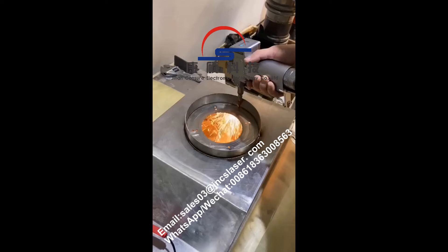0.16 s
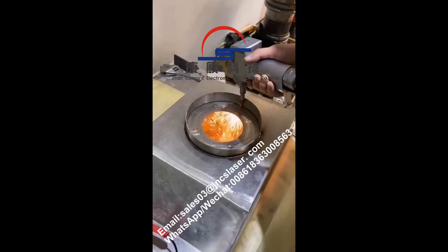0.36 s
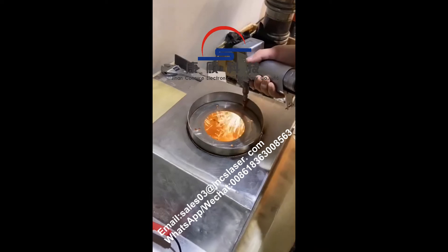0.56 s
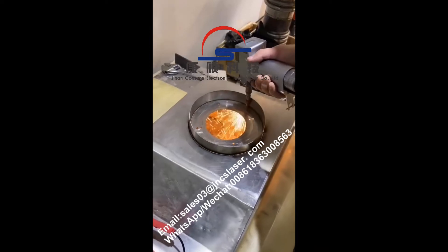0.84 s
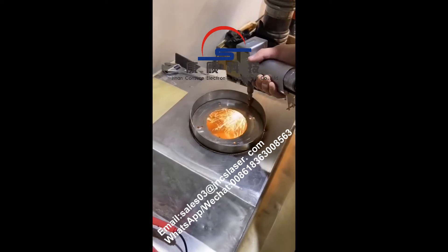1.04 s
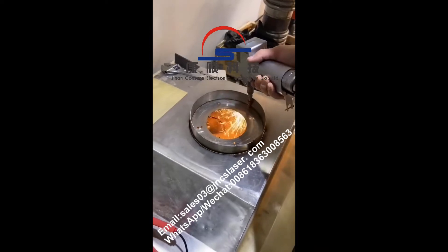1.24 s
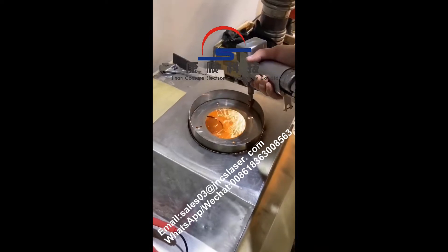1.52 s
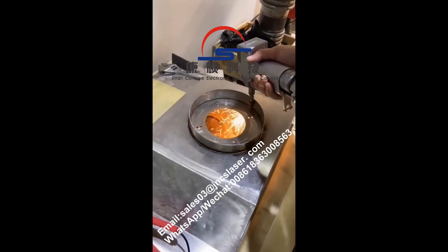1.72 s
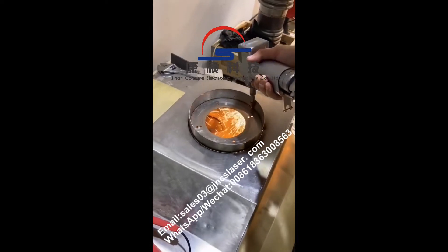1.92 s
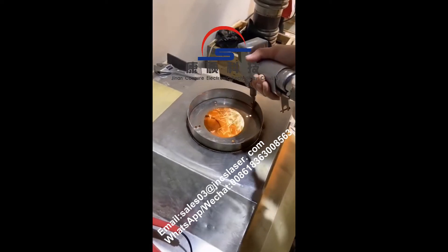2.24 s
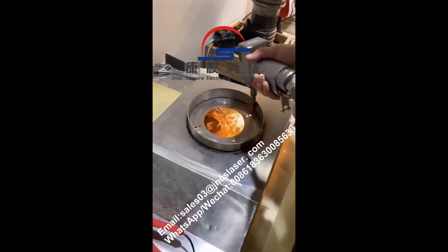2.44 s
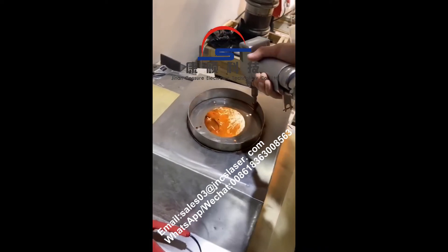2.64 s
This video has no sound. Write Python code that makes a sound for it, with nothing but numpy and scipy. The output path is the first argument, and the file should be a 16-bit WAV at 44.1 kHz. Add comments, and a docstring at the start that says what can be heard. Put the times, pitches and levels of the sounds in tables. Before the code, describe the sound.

A handheld laser welder works on a steel ring on a metal table, heard close up. Gas and sparks hiss steadily under a high, fluttering whine that strengthens after a second, with a low electric hum and fan rumble beneath.

```python
"""A handheld pulsed laser works on a steel ring on a metal table, heard from close by.
After a short silence the sound cuts in: the rapid pulses whine on four harmonics, shielding gas
and sparks hiss, and the power unit hums over a low fan rumble. The harmonics swell and fade as the
torch moves. The lowest one grows strong after about a second, and the third peaks near the end."""
import sys
import numpy as np
from scipy import signal
from scipy.fft import rfft, irfft
from scipy.io import wavfile
from scipy.ndimage import map_coordinates

SR = 44100
rng = np.random.default_rng(int(sys.argv[2]) if len(sys.argv) > 2 else 0)


def pcm_store(signal):
    """Save signal as 16-bit PCM."""
    levels = np.round(np.clip(np.atleast_2d(signal), -1, 1) * 32767)
    wavfile.write(sys.argv[1], SR, levels.astype(np.int16).T)


N = 122157
OPPOSITE = np.array([[1], [-1]])  # adds on the left, subtracts on the right

# Loudness of the whine, one list per harmonic, lowest first (time [s], level [dB])
WHINE_LEVELS = [
    [(0.18, -56), (0.24, -56), (0.34, -58), (0.4, -67), (0.46, -59), (0.55, -64), (0.57, -55), (0.66, -64),
     (0.75, -50), (0.77, -53), (0.94, -45.5), (0.97, -50), (1.03, -42.5), (1.07, -45), (1.1, -38),
     (1.25, -35.5), (1.28, -37.5), (1.46, -37), (1.56, -41), (1.66, -36), (1.87, -37.5), (1.9, -40.5),
     (2.08, -44), (2.18, -37.5), (2.27, -46.5), (2.44, -41.5), (2.66, -44.5), (2.77, -39)],
    [(0.18, -39.5), (0.32, -47), (0.37, -51), (0.58, -42.5), (0.83, -49.5), (0.94, -68), (1.02, -53),
     (1.78, -65), (1.9, -50), (2.08, -66), (2.11, -46), (2.32, -68), (2.77, -43)],
    [(0.18, -38.5), (0.34, -46), (0.37, -40), (0.43, -46), (1.1, -43), (1.23, -45), (1.35, -44), (2.0, -38),
     (2.04, -35), (2.07, -44), (2.18, -37), (2.27, -45), (2.42, -34), (2.44, -40), (2.5, -32.5),
     (2.58, -57), (2.73, -35.5), (2.77, -44)],
    [(0.18, -61), (0.4, -56), (0.45, -64), (0.99, -51), (1.04, -56), (1.09, -50), (1.58, -53), (1.64, -48),
     (1.77, -55), (2.06, -51), (2.16, -54), (2.77, -52)],
]
# Character of each harmonic (added level [dB], flutter size [dB], roughness level [dB])
WHINE_CHARACTER = [(3, 1.2, -18), (-4, 3.1, -25), (-2, 2.2, -10), (6.5, 0.5, -7)]


def laser_whine():
    """The pulses sound at whole multiples of their rate (harmonics); uneven pulses make them rough."""
    pulse_hz, flutter_hz, rough_hz = 3498.8, 22.2, 150
    hz = pulse_hz * (1 + 0.00037 * wander(flutter_hz))
    out = 0
    for k, (levels, (added_db, flutter_db, rough_db)) in enumerate(zip(WHINE_LEVELS, WHINE_CHARACTER), 1):
        pan_db = 0.4 * wander(2.5) * OPPOSITE
        pure = tone(k * hz)
        rough = normalize(sum(tone(k * hz) * wander(rough_hz) for _ in range(2)))
        level_db = curve(levels) + added_db + flutter_db * wander(flutter_hz) + pan_db
        out = out + (pure + gain(rough_db) * rough) * gain(level_db)
    return out


# Tone of four bands of noise, low to high (frequency [Hz], relative level [dB])
RING_RUSH = [(300, -23), (700, -7), (1250, -3), (1900, -2), (2500, 1), (2950, 2), (3200, -14),
             (3600, -11.5), (5000, -55)]  # gas rushing in the ring
NOZZLE_HISS = [(2800, -47), (3300, -12), (3800, -5.5), (4400, 0), (5100, 2.5), (5600, 2.5), (5850, -2.5),
               (6300, -35)]
HISS_TOP = [(5500, -22), (5900, 2.5), (6400, 3), (6700, -2.5), (6950, -5.5), (7300, -63)]
WELD_SIZZLE = [(7300, -53), (7800, -12), (8300, -8), (9300, -3.5), (10350, 0.5), (11100, -3), (11800, -3.5),
               (12500, -6), (13000, -10), (13300, -31), (14000, -29), (14700, -24), (15750, -17.5)]
# Loudness of the same four bands (time [s], level [dB])
RING_RUSH_LEVELS = [(0.19, -41.5), (0.22, -40.5), (0.54, -42.5), (0.89, -41), (1.24, -40.5), (1.4, -42.5),
                    (1.43, -41), (1.45, -42), (2.1, -42), (2.12, -45), (2.21, -42), (2.73, -42.5),
                    (2.74, -42.5)]
NOZZLE_HISS_LEVELS = [(0.19, -40.5), (0.22, -38.5), (0.49, -41), (0.64, -37.5), (0.69, -40), (0.94, -37),
                      (0.96, -40.5), (1.2, -38), (1.23, -37.5), (1.33, -42), (2.74, -37)]
HISS_TOP_LEVELS = [(0.19, -48.5), (0.46, -50), (0.59, -49.5), (1.05, -47), (1.08, -43), (1.15, -47),
                   (2.74, -43.5)]
WELD_SIZZLE_LEVELS = [(0.19, -33.5), (1.18, -32), (1.23, -30.5), (1.37, -33.5), (2.06, -31), (2.3, -33),
                      (2.34, -31), (2.73, -31.5), (2.74, -33)]


def gas_and_sparks():
    """Swirling gas and sparks fill four bands; unsteady burning makes them all sputter together."""
    sputter_db = 0.69 * wander(hz=49.7)
    pops = gain(-9.5) * sparks()

    def band(shape, levels, added_db, reflections_db):
        """One band flickers on its own in the middle, with weak reflections at the sides."""
        flicker_db = 0.65 * wander(hz=8.8)
        middle = colour(metal_ringing(table_echo(noise() + pops)), shape)
        sides = gain(reflections_db) * colour(noise(), shape) * OPPOSITE
        return gain(curve(levels) + added_db + sputter_db + flicker_db) * (middle + sides)

    return (band(RING_RUSH, RING_RUSH_LEVELS, added_db=0, reflections_db=-25.5)
            + band(NOZZLE_HISS, NOZZLE_HISS_LEVELS, added_db=-1.5, reflections_db=-22)
            + band(HISS_TOP, HISS_TOP_LEVELS, added_db=-0.7, reflections_db=-22)
            + band(WELD_SIZZLE, WELD_SIZZLE_LEVELS, added_db=-0.83, reflections_db=-20))


def sparks(per_second=3800):
    """Sparks make a dense stream of tiny pops of uneven size."""
    size = gain(2.5 * np.minimum(rng.exponential(size=N), 6))
    popping = rng.random(N) < per_second / SR
    return normalize(popping * size * rng.choice([-1, 1], N))


# Pitches at which the ring and table resonate (frequency [Hz], width [Hz], boost [dB])
METAL_RESONANCES = [(455, 15, 5), (789, 8.1, 9), (1097, 16, 0.5), (1270, 42, 5.5), (1490, 44, 5),
                    (1900, 76, 7), (2155, 26, 5), (2510, 82, 5), (5020, 60, -1), (5610, 30, 5),
                    (9260, 92, 0.5), (11930, 100, 1)]


def metal_ringing(x):
    """The metal colours a sound in narrow bands around its own pitches."""
    f = np.arange(N // 2 + 1) * SR / N
    boost_db = sum(db / (1 + (2 * (f - hz) / width) ** 2) for hz, width, db in METAL_RESONANCES)
    return irfft(rfft(x) * gain(boost_db), N)


def table_echo(x):
    """The hiss bounces off the table top; the tiny delay drifts as the hand moves."""
    delay_s = .0018 + .00007 * wander(hz=2.7)
    echo = map_coordinates(x, [np.arange(N) - delay_s * SR], mode="mirror")
    return x + gain(-12.5) * echo


# Tones in the electric hum (multiple of the mains frequency, level [dB])
HUM_TONES = [(2, -40), (4, -51), (6, -39.5), (8, -59.5), (16, -65)]


def power_unit(mains_hz=50):
    """The mains supply makes a wavering hum; the electronics add a faint, high whistle."""
    hum = sum(tone(round(k) * mains_hz) * gain(db + 0.5 * wander(6.4)) for k, db in HUM_TONES)
    whistle = gain(-65) * tone(hz=14397)
    return hum + whistle


# Tones of the cooling fan (frequency [Hz], level [dB])
FAN_TONES = [(47, -71), (70.5, -57.5), (125, -57), (139, -57.5), (163, -61)]
# Rumble of the fan and workshop (frequency [Hz], relative level [dB])
FAN_RUMBLE = [(20, -17), (35, -9), (55, -1.5), (125, -2), (210, -1), (290, -4), (370, -9), (520, -9),
              (750, -15), (1500, -25.5), (4000, -54)]


def cooling_fan():
    """The spinning fan gives low, wavering tones over a rumble that rings in the metal."""
    tones = sum(tone(hz * (1 + 0.0076 * wander(4))) * gain(db + 2.2 * wander(15)) for hz, db in FAN_TONES)
    rumble = gain(-47.5) * colour(metal_ringing(noise()), FAN_RUMBLE)
    return tones + rumble


# Background noise of the workshop (frequency [Hz], relative level [dB])
WORKSHOP_AIR = [(25, -8), (55, 3), (88, 1), (150, -8), (205, -3), (310, -17), (450, -4), (800, -3.5),
                (1300, -9.5), (3000, -26)]


def workshop_air():
    """Faint room noise, opposite in the two ears so that it seems to come from all around."""
    return gain(-64.5) * colour(noise(), WORKSHOP_AIR) * OPPOSITE


def gain(db):
    """Turn decibels into a number to multiply by."""
    return 10 ** (np.asarray(db) / 20)


def normalize(x):
    """Scale a signal to an average strength (rms) of 1."""
    return x / np.sqrt(np.mean(x ** 2))


def noise():
    """White noise: all frequencies equally strong."""
    return rng.standard_normal(N)


def curve(rows):
    """Join (time [s], value) points with straight lines."""
    return np.interp(np.arange(N) / SR, *np.array(rows).T)


def wander(hz):
    """A smooth random wobble of strength 1 that changes about hz times a second."""
    f = np.arange(N // 2 + 1) * SR / N
    keep_slow = np.exp(-(2 * f / hz) ** 2 / 2) * (f > 0)
    return normalize(irfft(rfft(noise()) * keep_slow, N))


def colour(x, points):
    """Shape a sound with (frequency [Hz], relative level [dB]) points, at strength 1."""
    f = np.maximum(np.arange(N // 2 + 1) * SR / N, 1)
    hz, db = np.array(points).T
    shape_db = np.interp(np.log(f), np.log(hz), db, left=-np.inf, right=-np.inf)
    return normalize(irfft(rfft(x) * gain(shape_db), N))


def tone(hz):
    """A pure tone of strength 1 that follows a steady or changing frequency."""
    cycles = np.cumsum(hz * np.ones(N)) / SR + rng.random()
    return np.sqrt(2) * np.sin(2 * np.pi * cycles)


def scene():
    """The torch slightly to the right, the power unit and fan in the middle, workshop air around them."""
    air = workshop_air()
    torch = (laser_whine() + gas_and_sparks()) * gain(-0.23 * OPPOSITE)
    return torch + power_unit() + cooling_fan() + air


def record(dry):
    """The sound cuts in abruptly, and the very highest treble is removed."""
    start_s, fade_in_s, top_hz = .162, .002, 15800
    opening = np.clip((np.arange(N) / SR - start_s) / fade_in_s, 0, 1)
    treble_cut = signal.ellip(10, .1, 80, top_hz, fs=SR, output="sos")
    return signal.sosfilt(treble_cut, dry * opening)


dry = scene()
out = record(dry)
pcm_store(out)
```